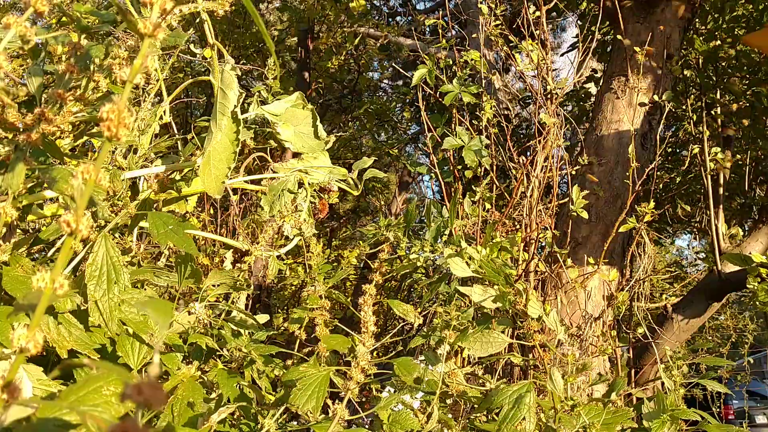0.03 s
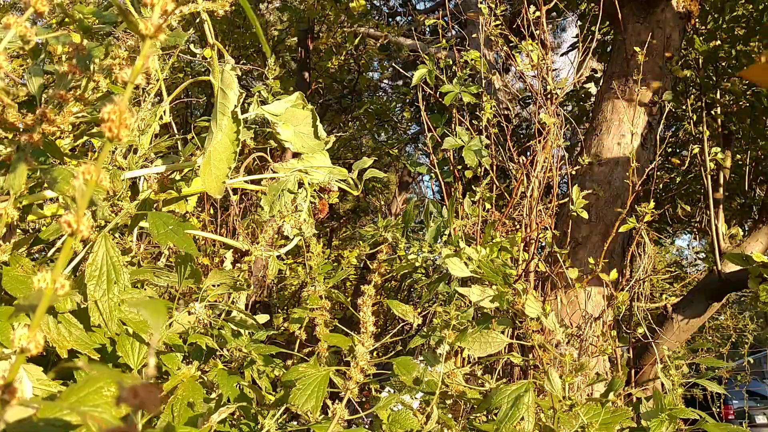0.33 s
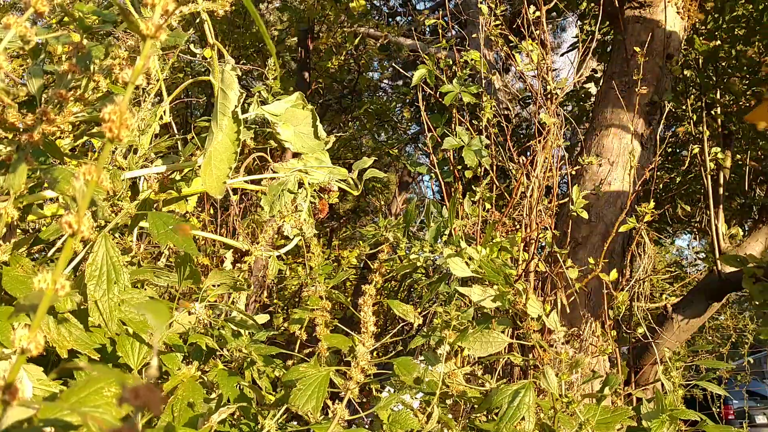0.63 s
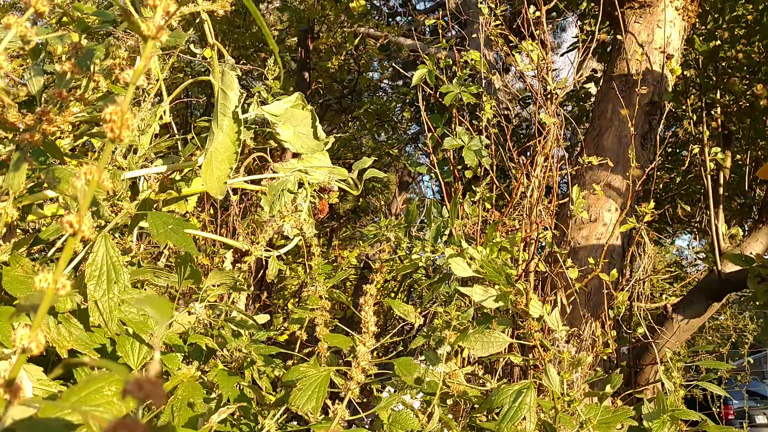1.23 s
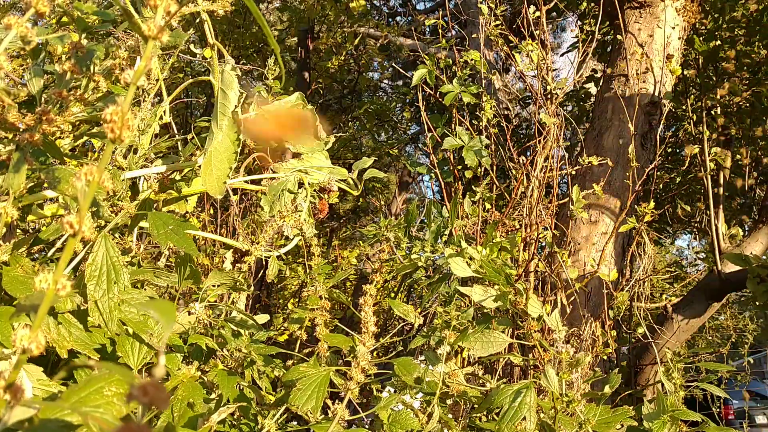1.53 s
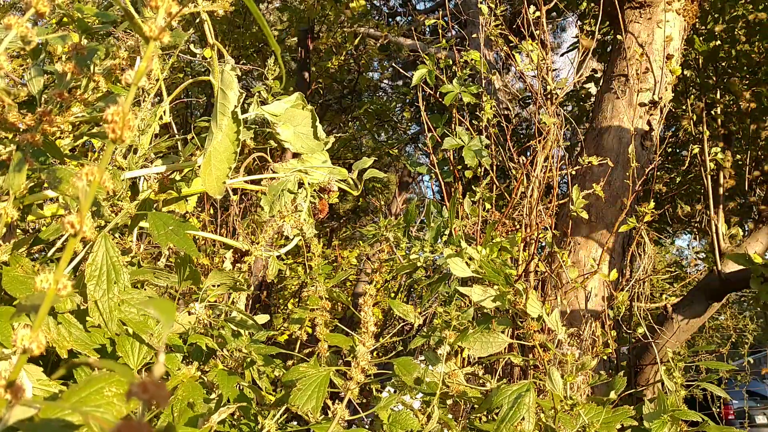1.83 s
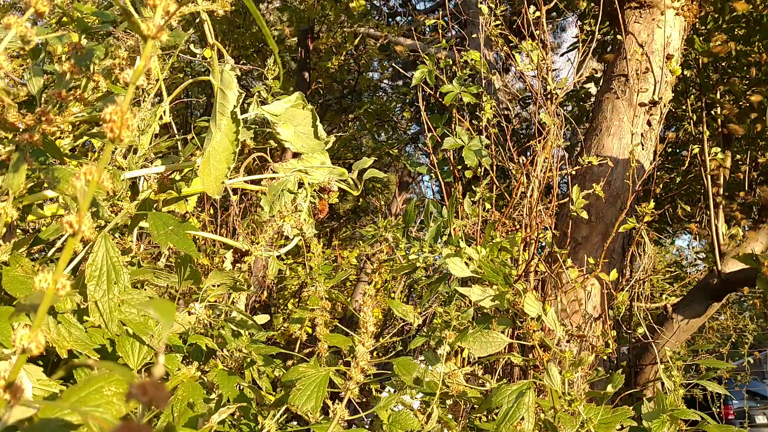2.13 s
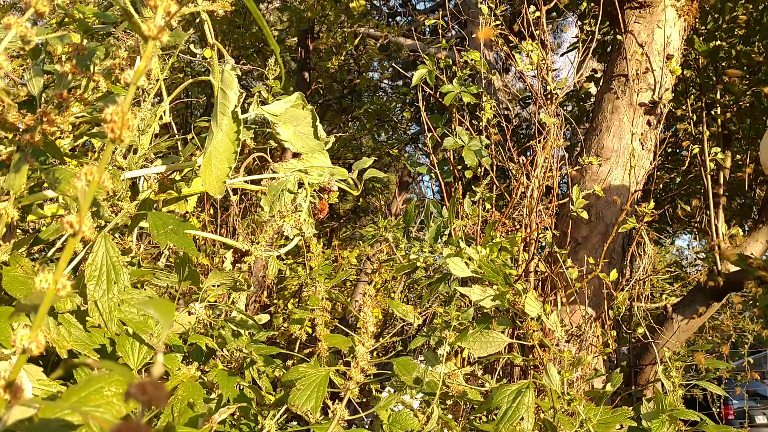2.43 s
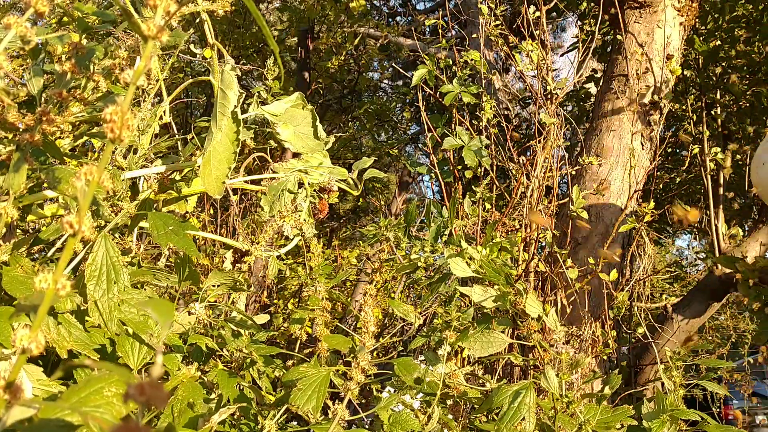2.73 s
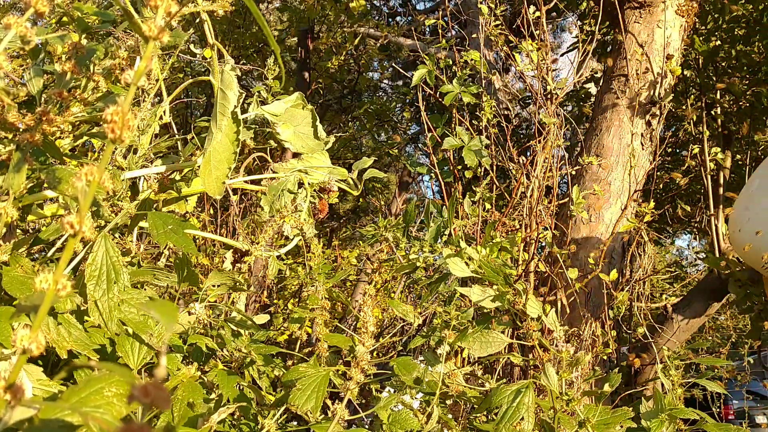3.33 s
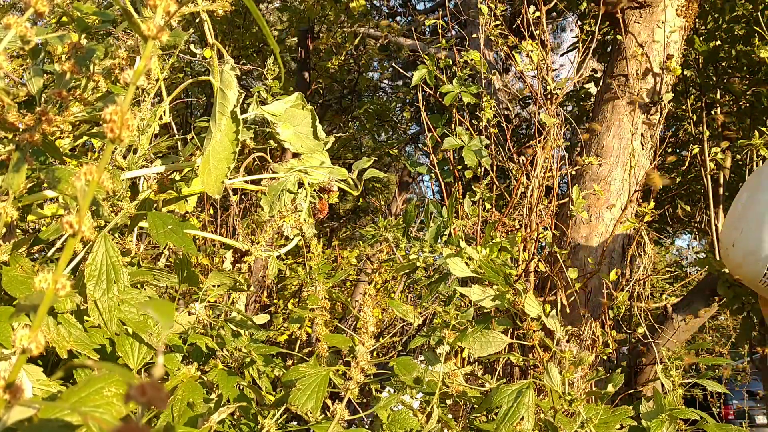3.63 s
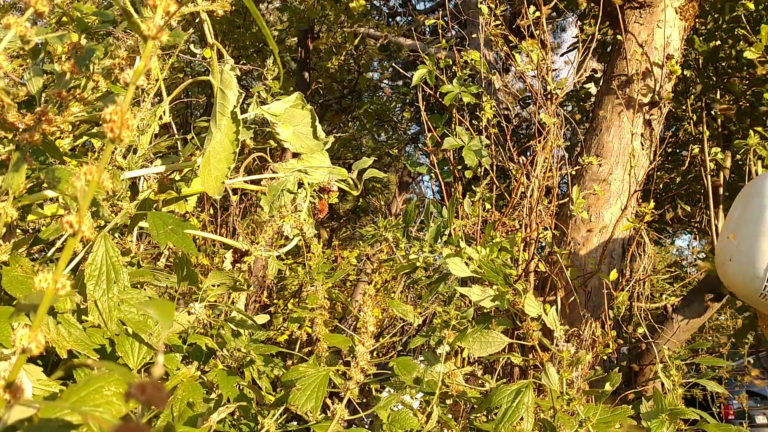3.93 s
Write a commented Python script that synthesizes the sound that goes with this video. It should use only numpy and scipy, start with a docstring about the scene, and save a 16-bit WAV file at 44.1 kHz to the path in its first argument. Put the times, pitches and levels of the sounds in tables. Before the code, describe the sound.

A swarm of bees buzzing steadily outdoors, with a light breeze and faint leaf rustles.

```python
"""Bee swarm in a thicket.

Dozens of wingbeats, slightly to the right, each drifting in pitch and distance, merge into one buzz.
Single bees swerve close; a deeper hum comes and goes underneath. A light breeze hisses in the
foliage and rumbles faintly; now and then dry leaves brush and snap."""
import sys
import numpy as np
from scipy import signal
from scipy.fft import rfft, irfft, next_fast_len
from scipy.io import wavfile
from scipy.ndimage import uniform_filter1d, map_coordinates

SR = 44100
rng = np.random.default_rng(int(sys.argv[2]) if len(sys.argv) > 2 else 0)


def log_audio(samples):
    """Write samples as a 16-bit WAV file to the path given in sys.argv[1]."""
    # one column per channel
    frames = np.atleast_2d(samples).T
    # limit to full scale, then quantise
    limited = np.clip(frames, -1, 1)
    pcm = np.round(limited * 32767).astype(np.int16)
    wavfile.write(sys.argv[1], SR, pcm)


N = 176400

# wing stroke spectra (harmonic [n], gain [dB])
FAST_HARMONICS = [(1, -10), (2, 0.5), (3, -11.5), (4, -9.5), (5, -9), (6, -18), (8, -22.5), (12, -31)]
SLOW_HARMONICS = [(1, -9.5), (2, 1.5), (3, -15), (4, -19.5), (5, -9), (6, -10.5), (8, -21), (12, -21)]
# swells of the buzz's mid and low bands, applied about their means (time [s], level [dB])
MID_SWELL = [(0.0, -44), (0.055, -46), (0.11, -51.5), (0.4, -47.5), (0.56, -46), (0.63, -54), (0.7, -47),
             (0.92, -50), (1.01, -44), (1.12, -50), (1.2, -44.5), (1.37, -50), (1.73, -47.5), (1.92, -54.5),
             (2.1, -46), (2.28, -56.5), (2.36, -47.5), (3.85, -48.5), (3.9, -45), (4.0, -49)]
LOW_SWELL = [(0.0, -77), (0.04, -54.5), (0.5, -75), (0.52, -54), (0.97, -78), (1.0, -54), (1.31, -57.5),
             (1.51, -52.5), (1.75, -64), (1.77, -57), (2.02, -53.5), (2.16, -77), (2.21, -53.5),
             (2.26, -77), (2.36, -57.5), (3.44, -58), (3.46, -53), (4.0, -52.5)]
# upper harmonics of the buzz (time [s], gain [dB])
RASP_GAIN = [(0.0, 2), (.15, 0.5), (.6, -1), (1.0, 1.5), (1.24, 2.5), (1.4, 1.5), (2.2, 2), (2.73, 2.5),
             (2.93, 4.5), (3.07, 2), (3.4, 1), (4.0, 3.2)]
# close bees (time [s], wingbeat [Hz], glide [ratio], half length [s], fundamental [dB], overtones [dB])
PASSES = [(.28, 167.5, -.02, 0.025, -56, -82), (.57, 206.4, -0.022, 0.051, -61, -52),
          (.70, 248.1, .025, 0.038, -58, -48), (.87, 170, 0.041, 0.03, -54.5, -79),
          (1.015, 256.7, 0.0057, .03, -55.5, -43.5), (1.03, 204, -0.021, 0.025, -60, -54),
          (1.21, 235, -.025, 0.022, -63, -47.5), (1.51, 216.3, -.02, 0.047, -53, -56),
          (1.56, 245, .035, 0.047, -57, -52.5), (1.745, 247.6, -0.02, .03, -69, -45.5),
          (1.88, 251, .02, 0.062, -59.5, -53), (2.08, 247, -0.031, 0.019, -62, -49.5),
          (2.37, 254.3, -.025, 0.025, -59, -48), (2.47, 205.3, -.02, 0.047, -58, -51),
          (2.67, 236, -.02, 0.041, -56, -50.5), (2.73, 255, -.02, 0.023, -72, -50),
          (2.95, 210, 0.017, .05, -67, -54.5), (3.11, 243.5, .025, 0.042, -57.5, -51.5),
          (3.17, 261, 0.025, 0.032, -66, -47.5), (3.375, 246, 0.033, .028, -60, -45),
          (3.54, 248.2, -0.011, 0.04, -61, -49), (3.73, 236.4, -.035, 0.029, -54.5, -53),
          (3.90, 245, 0.031, 0.033, -54.5, -50)]
# overtones of a close bee (harmonic [n], gain [dB])
PASS_HARMONICS = [(2, -0.5), (3, -14.5), (4, -14), (5, -17), (6, -23)]
# stereo balance (frequency [Hz], left minus right [dB])
BEE_BALANCE = [(240, 2), (500, 1.7), (1200, 0.2), (1700, -3), (3000, -8)]
LEAF_BALANCE = [(800, -11), (2000, -3), (6500, -3), (8000, 0.5), (9800, 1), (11000, -5.5), (12200, -11),
                (15000, -14.5)]
# envelopes ahead of trims and panning (time [s], level [dB])
HUM_LEVEL = [(0.0, -78), (0.05, -56.5), (0.21, -69), (0.28, -68), (0.41, -68.5), (0.85, -59), (1.2, -55.5),
             (1.24, -66), (1.34, -56), (1.88, -65), (1.97, -56.5), (2.17, -72.5), (2.33, -64), (3.65, -80),
             (3.71, -59.5), (4.0, -83)]
RUMBLE_LEVEL = [(0.0, -72), (0.33, -63), (0.44, -74), (0.89, -64), (1.38, -70), (1.61, -62), (2.29, -77.5),
                (2.36, -65), (2.7, -77), (2.73, -68.5), (3.1, -67.5), (3.17, -87), (3.35, -62.5),
                (3.42, -85), (3.65, -67), (3.72, -74), (3.79, -66), (4.0, -74)]
AIR_LEVEL = [(0.0, -54.5), (.65, -54), (1.1, -54), (4.0, -53)]
HISS_LEVEL = [(0.0, -49.5), (0.31, -50), (0.66, -48.5), (1.08, -48.5), (1.37, -47.5), (2.03, -49),
              (2.34, -48), (2.43, -47.5), (3.9, -48.5), (4.0, -48.5)]
# leaves brushing (peak time [s], fall time [s], level [dB])
BRUSHES = [(0.53, 0.025, -48.5), (0.69, .05, -45.5), (0.806, 0.051, -45.5), (1.127, 0.011, -45),
           (1.225, 0.021, -37), (1.557, .009, -44), (1.71, .014, -44.5), (1.768, 0.023, -42.5),
           (2.37, 0.12, -44.5), (2.406, .003, -42), (2.436, 0.0048, -44), (2.449, 0.0085, -41),
           (2.457, 0.017, -46), (2.842, 0.008, -45), (3.02, 0.048, -45.5), (3.22, 0.0075, -45),
           (3.577, 0.015, -47)]
# dry leaves snapping (time [s], level [dB])
SNAPS = [(1.218, -42), (1.237, -44), (1.555, -49), (1.758, -39.5), (2.434, -41), (2.446, -37.5)]
# noise spectra (frequency [Hz], gain [dB])
RUMBLE_SPECTRUM = [(20, -30), (38, -30), (62, -17), (82, -5), (105, -4), (135, 1), (200, 0), (270, -22),
                   (400, -47), (900, -66)]
AIR_SPECTRUM = [(30, -50), (200, -5), (330, 2), (680, 8), (860, -4.5), (1200, 5.5), (1450, -2), (2000, -3),
                (4000, -3.5), (6000, -7), (9000, -7.5), (16000, -28)]
HISS_SPECTRUM = [(500, -25), (2500, -13.5), (4500, -9.5), (6200, -11.5), (8000, -4), (10000, -2.5),
                 (11800, 1.7), (13500, 0.1), (16000, -3)]
BRUSH_SPECTRUM = [(400, -30), (2000, -9), (4000, -8.5), (6500, -1.5), (9000, 4), (12000, 8.5), (16000, -1)]
SNAP_SPECTRUM = [(1000, -31), (3300, -1), (4600, -8), (6100, 4), (7300, -4.5), (10500, -0.5), (13000, 7),
                 (16000, -10)]

DRIFT_RATIO, DRIFT_HZ = .028, 6
FLUTTER_RATIO, PASS_FLUTTER_RATIO, FLUTTER_HZ = .008, .0047, 22
SWERVE_DB, SWERVE_HZ = 2.5, 5.03  # level swing as a bee nears and leaves
LAG_S, LAG_SPREAD_S = .00024, .000098  # left channel delay


def amp(db):
    """Decibels to gain."""
    return 10 ** (np.asarray(db) / 20)


def unit(x):
    """Scale to rms 1."""
    return x / np.sqrt(np.mean(x ** 2) + 1e-20)


def along(points, hz):
    """Interpolate (frequency, value) rows on a log axis."""
    f, v = np.transpose(points)
    return np.interp(np.log(hz + .00093), np.log(f), v)


def curve(rows):
    """Interpolate (time, value) rows per sample."""
    return np.interp(np.arange(N) / SR, *np.transpose(rows))


def wobble(rate_hz):
    """Smooth curve through random knots."""
    grid_s = np.linspace(0, N / SR, 1000)
    smooth = map_coordinates(rng.standard_normal(512), [grid_s * rate_hz + 2], mode="wrap")
    return np.interp(np.arange(N) / SR, grid_s, smooth)


def filtered(x, response):
    """Apply a frequency response."""
    size = next_fast_len(N + SR // 4)
    return irfft(rfft(x, size) * response(np.fft.rfftfreq(size, 1 / SR)), size)[..., :N]


def coloured(x, spectrum):
    """Shape by a spectrum, at rms 1."""
    return unit(filtered(x, lambda hz: amp(along(spectrum, hz))))


def panned(x, balance):
    """Constant-power pan per frequency."""
    def gains(hz):
        g = amp(np.outer([.5, -.5], along(balance, hz)))
        return g / np.sqrt(np.mean(g ** 2, axis=0))
    return filtered(x, gains)


def bees(harmonics, count, wing_hz, spread_ratio):
    """Each bee repeats its own wing stroke at a wandering rate, from its own direction."""
    out = np.zeros((2, N))
    k = np.arange(1, 13)
    cycle = np.linspace(0, 1, 2048, endpoint=False)
    rank = (np.arange(count) + .5) / count
    for offset in np.log(rank / (1 - rank)) * np.sqrt(3) / np.pi:  # logistic spread of pitches
        gains = amp(along(harmonics, k) + rng.normal(0, 1.54, len(k)))
        stroke = gains @ np.sin(2 * np.pi * (np.outer(k, cycle) + rng.random((len(k), 1))))
        wander = DRIFT_RATIO * wobble(DRIFT_HZ) + FLUTTER_RATIO * wobble(FLUTTER_HZ)
        hz = wing_hz * (1 + spread_ratio * offset + wander)
        beats = np.cumsum(hz) / SR
        lag_s = LAG_S + LAG_SPREAD_S * rng.standard_normal()
        index = (np.array([beats - lag_s * hz, beats]) * len(cycle)).astype(int) % len(cycle)
        out += unit(stroke)[index] * amp(SWERVE_DB * np.tanh(wobble(SWERVE_HZ)))
    return unit(out)


def swarm(low_edge_hz=324, rasp_edge_hz=600):
    """Fast and slow wingbeats merge into a buzz whose three bands swell separately."""
    buzz = amp(-48.5) * bees(FAST_HARMONICS, count=48, wing_hz=250.75, spread_ratio=.04)
    buzz += amp(-53) * bees(SLOW_HARMONICS, count=18, wing_hz=212.96, spread_ratio=.027)
    low = filtered(buzz, lambda hz: 1 / (1 + (hz / low_edge_hz) ** 16))
    rasp = filtered(buzz, lambda hz: 1 - 1 / (1 + (hz / rasp_edge_hz) ** 16))
    mid = buzz - low - rasp
    low_db, mid_db = curve(LOW_SWELL), curve(MID_SWELL)
    low *= amp(low_db - low_db.mean() - 2)
    mid *= amp(.98 * (mid_db - mid_db.mean()))
    rasp *= amp(curve(RASP_GAIN))
    return panned(low + mid + rasp, BEE_BALANCE)


def close_bees():
    """Single bees swell out of the swarm, gliding in pitch as they turn."""
    t, out = np.arange(N) / SR, np.zeros((2, N))
    for at_s, wing_hz, glide, half_s, fundamental_db, overtone_db in PASSES:
        progress = (t - at_s) / half_s
        hz = wing_hz * (1 + glide * np.tanh(progress) + PASS_FLUTTER_RATIO * wobble(FLUTTER_HZ))
        near = np.abs(t - at_s) < .4
        beats = np.cumsum(hz[near]) / SR - np.array([[LAG_S * wing_hz], [0]])
        partials = [(1, fundamental_db)] + [(k, overtone_db + db) for k, db in PASS_HARMONICS]
        tone = sum(amp(db) * np.sin(2 * np.pi * (k * beats + rng.random())) for k, db in partials)
        out[:, near] += np.sqrt(2) * tone / np.cosh(progress[near])
    return panned(out, BEE_BALANCE)


def drone(hz, waver_ratio):
    """Tone unsteady in pitch and level."""
    cycles = np.cumsum(hz * (1 + waver_ratio * wobble(14))) / SR
    return unit(np.sin(2 * np.pi * cycles) * amp(2.9 * wobble(14)))


def hum(pitch_hz=168.9):
    """Deep wavering hum with a looser, wider layer."""
    scatter = np.array([drone(pitch_hz, waver_ratio=.11) for side in range(2)])
    return (drone(pitch_hz, waver_ratio=.027) + amp(-5.5) * scatter) * amp(curve(HUM_LEVEL))


def crackle(rate_hz, spread_db):
    """Tiny random leaf contacts of uneven size."""
    hits = rng.random((2, N)) < rate_hz / SR
    signs = np.sign(rng.standard_normal((2, N)))
    return unit(hits * signs * amp(spread_db * rng.uniform(-1.1, 1, N)))


def brushes(rise_ratio=.68):
    """Leaves brush in short bursts of dense crackle."""
    t, power = np.arange(N) / SR, np.zeros(N)
    for peak_s, fall_s, db in BRUSHES:
        width_s = fall_s * np.where(t < peak_s, rise_ratio, 1)
        power += amp(db) ** 2 * np.exp(-((t - peak_s) / width_s) ** 2)
    friction = .45 * rng.standard_normal((2, N)) + crackle(rate_hz=2900, spread_db=9)
    return np.sqrt(power) * coloured(friction, BRUSH_SPECTRUM)


def snaps(decay_s=.0079):
    """Dry leaves give way in sudden, fast-fading bursts."""
    t = np.arange(N) / SR
    force = sum(amp(db) * (t >= at_s) * np.exp(-np.abs(t - at_s) / decay_s) for at_s, db in SNAPS)
    return panned(force * coloured(rng.standard_normal((2, N)), SNAP_SPECTRUM), LEAF_BALANCE)


def foliage(hiss_trim_db=4):
    """Soft air, leaf hiss following the breeze, and brushing leaves."""
    air = amp(curve(AIR_LEVEL)) * coloured(rng.standard_normal((2, N)), AIR_SPECTRUM)
    rustle = rng.standard_normal((2, N)) + .39 * crackle(rate_hz=500, spread_db=9.5)
    hiss = coloured(rustle, HISS_SPECTRUM) * amp(curve(HISS_LEVEL) + hiss_trim_db + .11 * wobble(22))
    return panned(patchy(air + hiss + brushes()), LEAF_BALANCE)


def patchy(x, depth_db=2):
    """Small random patches of gain in time and frequency."""
    spectra = signal.stft(x, nperseg=1024)[2]
    patches = uniform_filter1d(rng.standard_normal(spectra.shape), size=6, axis=1)
    patches = uniform_filter1d(patches, size=8, axis=2)
    return signal.istft(spectra * unit(amp(depth_db * unit(patches))), nperseg=1024)[1][:, :N]


def rumble():
    """Faint breeze rumble, with a low throb an octave below the hum."""
    noise = rng.standard_normal(N) + .27 * rng.standard_normal((2, N))
    wind = amp(5.5) * coloured(noise, RUMBLE_SPECTRUM)
    throb = amp(-5.5) * drone(hz=86.2, waver_ratio=.048)
    return (wind + throb) * amp(curve(RUMBLE_LEVEL))


def low_bed():
    """Hum and rumble, later and louder on the left."""
    left, right = hum() + rumble()
    left = filtered(left, lambda hz: np.exp(-2j * np.pi * hz * LAG_S))
    return panned(np.array([left, right]), balance=[(60, 2.2), (300, 3.6)])


def scene():
    """Bees over the low bed and leaves."""
    return swarm() + close_bees() + low_bed() + foliage() + snaps()


def record(dry):
    """Brick-wall low-pass."""
    return filtered(dry, lambda hz: hz < 15850)


dry = scene()
out = record(dry)
log_audio(out)
```